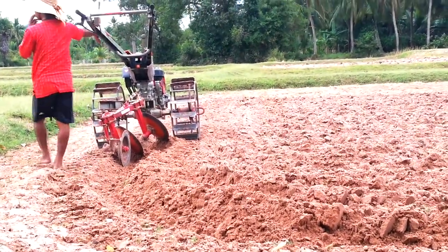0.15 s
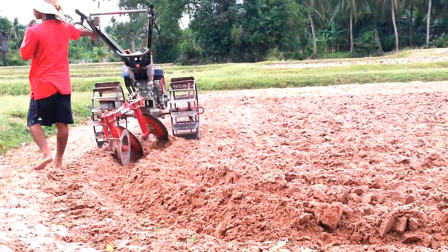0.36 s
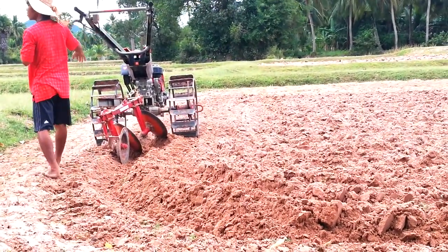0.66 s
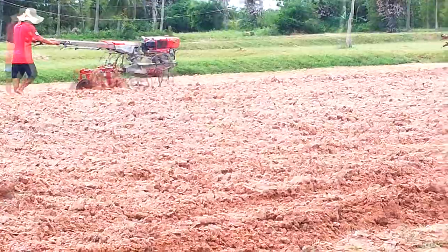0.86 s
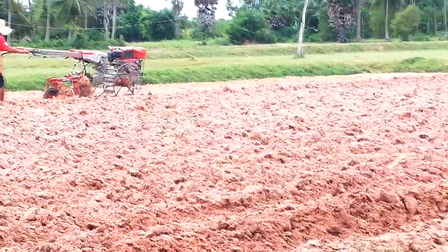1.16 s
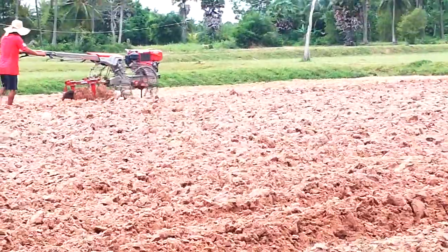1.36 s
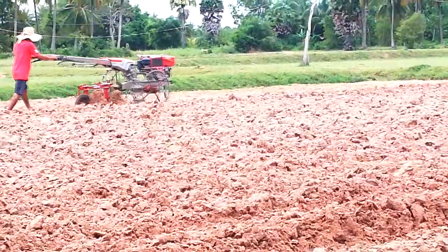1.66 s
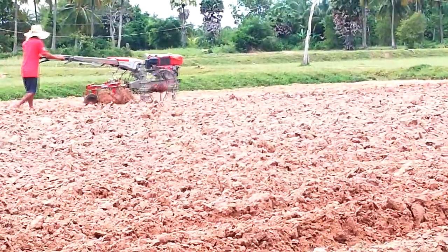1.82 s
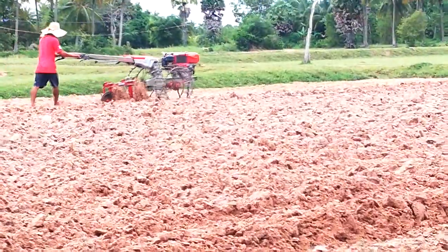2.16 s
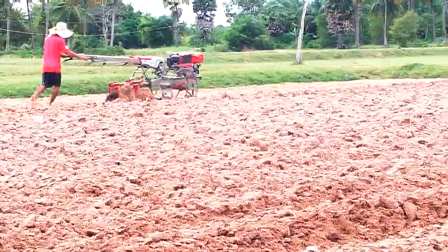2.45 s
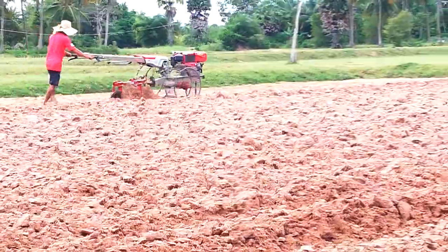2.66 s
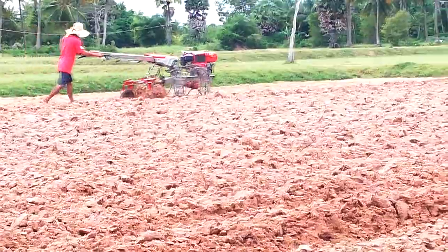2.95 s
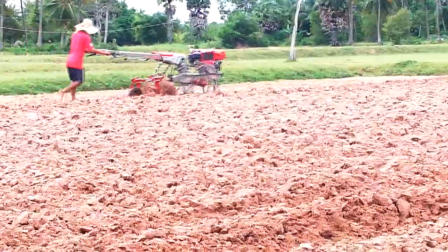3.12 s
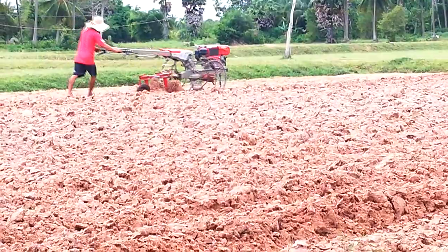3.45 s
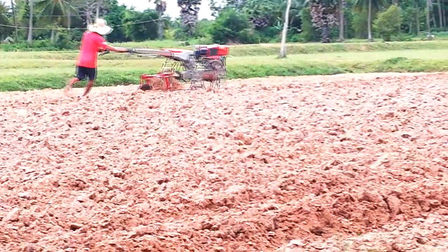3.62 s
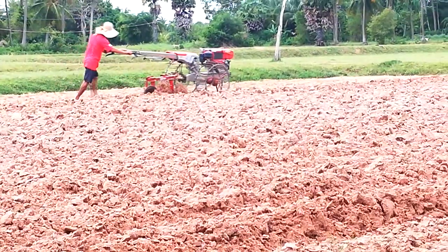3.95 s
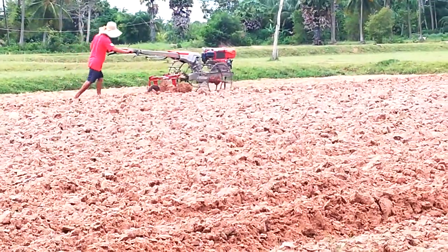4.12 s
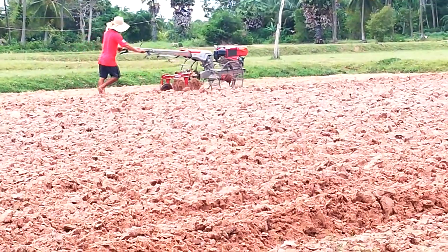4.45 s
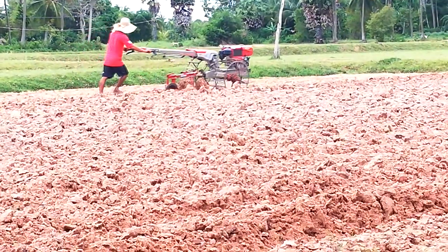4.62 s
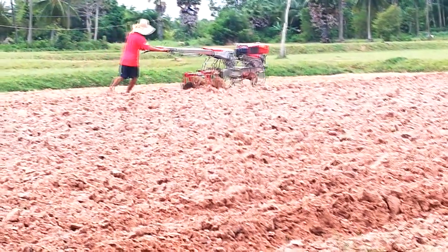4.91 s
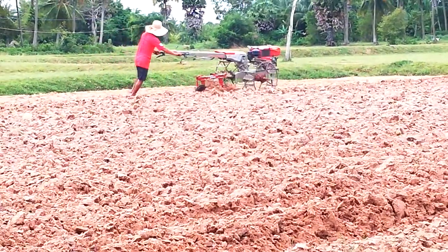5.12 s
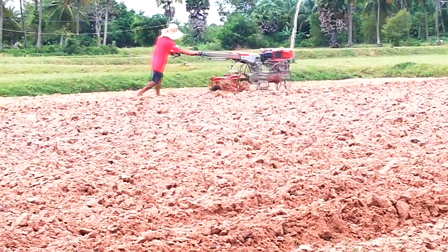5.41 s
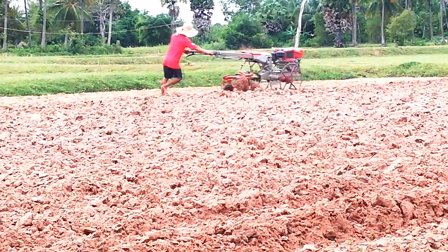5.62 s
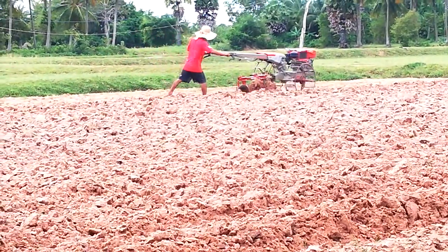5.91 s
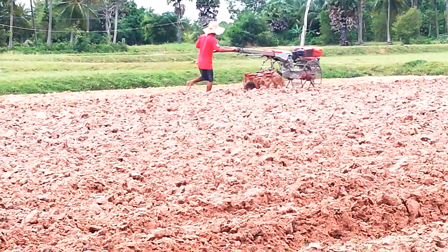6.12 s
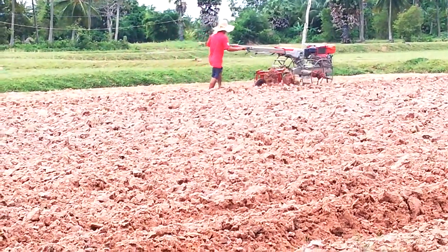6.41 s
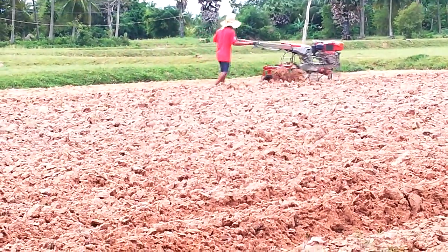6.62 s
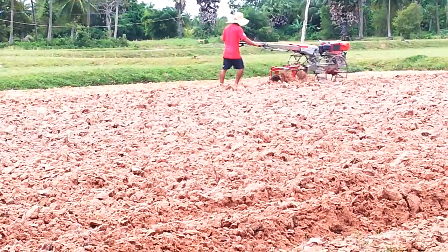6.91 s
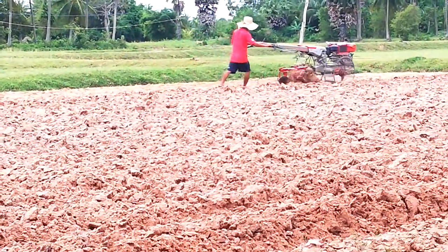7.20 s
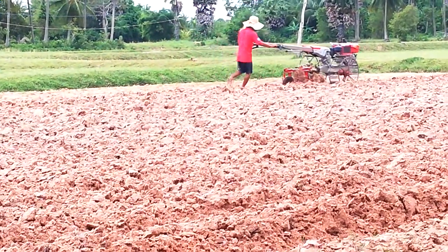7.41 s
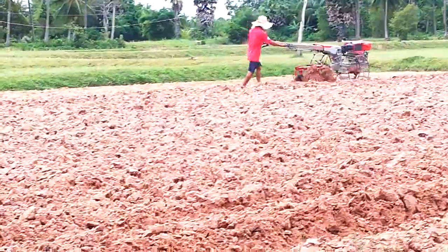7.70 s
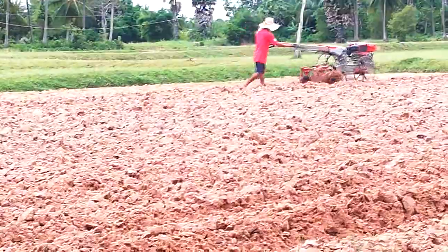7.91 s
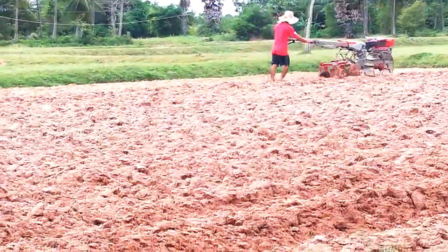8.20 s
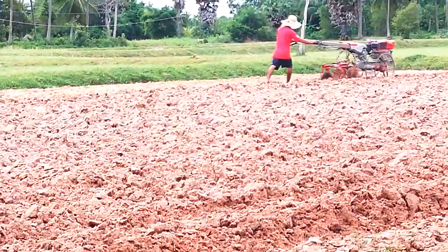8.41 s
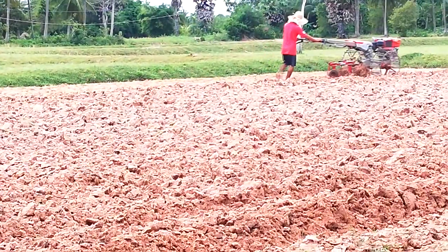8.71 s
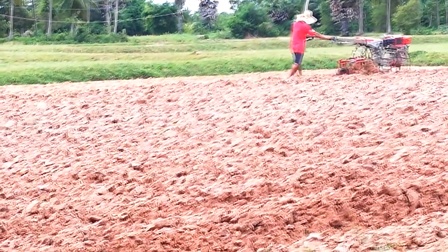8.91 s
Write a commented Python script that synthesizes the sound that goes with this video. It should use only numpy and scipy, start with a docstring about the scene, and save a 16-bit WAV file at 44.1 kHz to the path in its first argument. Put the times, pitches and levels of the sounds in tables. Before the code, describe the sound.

Steady slow diesel chugging, six or seven sharp knocks and thumps a second, with rattling metal and low soil rumble, gradually receding across an open field.

```python
"""A walking tractor ploughs dry soil in the open; its one-cylinder, four-stroke diesel fires 6 or 7 times a second.
Every cycle: intake gulp, a hum in the intake pipe as the valve shuts, firing knock, exhaust thump and hiss.
At first it is close, heard from behind, and loose ironwork clanks and leaves the covers rattling. The engine
slows, then picks up; the tractor shows its side and draws away, with a low swell, dull bursts and more clanks.
Near the end a plough disc sings briefly. Short pulses, ringing notes and filtered noise make the sounds."""
import sys
import numpy as np
from scipy import signal
from scipy.fft import rfft, irfft
from scipy.io import wavfile
from scipy.ndimage import uniform_filter1d, map_coordinates

SR = 44100
rng = np.random.default_rng(int(sys.argv[2]) if len(sys.argv) > 2 else 0)


def unload_wav(signal):
    """Save mono or channel-first audio to the path in sys.argv[1] as 16-bit WAV at rate SR, clipped to [-1, 1]."""
    wavfile.write(
        sys.argv[1],
        SR,
        np.round(np.clip(np.atleast_2d(signal).T, -1, 1) * 32767).astype(np.int16),
    )


N = 399546
TIME, HZ = np.arange(N) / SR, np.fft.rfftfreq(N, 1 / SR)

# engine speed: t/s, four-stroke cycles per second
ENGINE_SPEED = [(0.0, 7.052), (0.5, 7.273), (1.2, 7.084), (1.65, 7.184), (1.946, 6.544), (2.234, 6.191),
                (2.897, 5.948), (3.304, 6.522), (3.957, 6.583), (4.793, 6.45), (6.921, 6.83),
                (7.336, 7.116), (7.82, 7.224), (9.06, 7.049)]
START_TURN = -.1756  # place in the cycle at time 0, in cycles
# how hard the governor fuels the engine: t/s, load (0 to 1)
ENGINE_LOAD = [(0, 0.79), (1.52, 1), (1.68, 0.54), (2.1, 0.48), (2.45, 0.88), (3.1, 0.82), (3.95, 0.6),
               (4.65, 0.86), (6.8, 0.55), (8.1, 0)]
# how hard the fuel knocks: t/s, level/dB
KNOCK_HARDNESS = [(0, -4.5), (.35, -2.5), (.7, -0.5), (1.6, 3.5), (1.9, -2), (2.4, -5), (2.9, 0.5),
                  (3.3, 0.5), (3.9, 3), (5.55, 5), (6.1, 3), (7.15, 4), (7.5, -0.5), (7.85, 2), (8.3, -2),
                  (9.06, 1.5)]
# the tractor's way across the field: t/s, distance/m, aspect (0 behind, 1 beside, 2 ahead)
TRACTOR_PATH = [(0, 2.62, 0.056), (1.75, 5.5, 0.047), (3.75, 10.5, .02), (4.5, 13.9, 1.12),
                (5.5, 15.2, 1.04), (6.2, 17.5, 1.17), (7.1, 17.5, 0.86), (8.1, 23, 1.9), (9.06, 21, 1.92)]
NEAR_M = 5  # distance at which spreading changes no level

# steady rumble of gears, wheels and turning soil: f/Hz, relative level/dB
RUMBLE_COLOUR = [(35, -4), (80, -4.5), (150, 3.5), (260, 3.5), (380, -14.5), (580, -29.5), (1500, -24.5),
                 (16000, -49)]
# crumbling clods: f/Hz, relative level/dB
CLOD_COLOUR = [(200, -2.5), (540, 5.5), (680, -4), (880, 5.5), (1150, 0.5), (1500, -22), (3000, -11.5),
               (16000, -25)]
# brief low swells and crumbly bursts, the first one the longest: # t/s, low level/dB, crumbling level/dB,
# decay/s
LOW_SWELLS = [(3.4, -33, -47, 0.1), (4.11, -40, -42, 0.012), (7.458, -36, -46, 0.011)]
SWELL_RISE_S = 0.0082
# a plough disc rubs and sings: t/s, length/s, f/Hz, level/dB
DISC_SQUEALS = [(8.17, 0.18, 1180, -52)]
# a cover or a bar is jolted and zings around one note: t/s, f/Hz, level/dB, decay/s
METAL_ZINGS = [(0.121, 10640, -24.5, 0.0057), (.261, 11150, -27, 0.0055), (.369, 2100, -30, 0.019),
               (.404, 11000, -28, 0.0046), (.4855, 3770, -23.5, 0.014), (.486, 1348, -24, .016),
               (.495, 965, -25, .005), (.958, 10950, -27, 0.0045), (1.097, 11140, -31, .005),
               (1.348, 864, -33, 0.023), (1.377, 11000, -19, 0.01), (1.519, 11320, -21, 0.0097),
               (1.765, 2093, -32.5, 0.022), (1.766, 4000, -40.5, 0.048), (2.428, 10560, -30, 0.0094),
               (2.738, 5890, -43, 0.028), (4.022, 2650, -37, .011), (4.935, 10700, -40, 0.014),
               (6.853, 2660, -41, 0.0098), (6.953, 1120, -42, 0.0095), (6.954, 3590, -46, .014),
               (6.956, 4450, -40, 0.012)]
ZING_WIDTH, ZING_RISE_S = 0.0404, 0.00095  # width as a share of the note

# blows on plough and loose ironwork: t/s, relative clank level/dB, jingle level/dB, decay/s
IRON_KNOCKS = [(0.262, -31.5, -44, 0.0021), (0.483, -23.5, -21.5, 0.013), (0.5397, -37, -21, 0.0073),
               (.559, -34, -44, 0.0082), (1.3758, -40.5, -25.5, 0.0026), (1.517, -36.5, -23.5, 0.0049),
               (1.766, -53, -57, 0.018), (1.8, -44, -61, 0.0038), (2.738, -53, -33, 0.0091),
               (3.768, -40, -54, 0.011), (3.826, -52, -67, 0.013), (4.007, -57, -19, 0.0063),
               (4.02, -40, -33.5, 0.016), (4.072, -46, -42, 0.0026), (4.149, -46, -57, 0.018),
               (6.95, -46.5, -51, 0.02), (7.461, -52.5, -48, 0.01)]
# broad clank of the ironwork: f/Hz, relative level/dB
CLANK_COLOUR = [(200, -5), (600, -5.5), (1000, 1.5), (1360, -2.5), (1720, 0.5), (2740, -0.5), (3900, 1),
                (5430, -4.5), (9550, -9), (16000, -41)]
# bright jingle of the ironwork: f/Hz, relative level/dB
JINGLE_COLOUR = [(2350, -15), (4300, -12), (5600, -34), (6400, -0.5), (7400, -8.5), (8750, 3), (10400, 6),
                 (16000, -24)]
# ringing of the plough frame: f/Hz, relative level/dB, time to fall by 60 dB/s
PLOUGH_MODES = [(886, -15, 0.4), (960, -6, 0.26), (1242, -14, 0.18), (1333, -10, 0.15), (2290, -11, 0.19),
                (2710, -7, 0.19), (3710, -15, 0.35), (6200, -15, 0.14)]
LOOSE_DB, SETTLE_S = -19, 1  # rattle that a knock shakes loose, against its jingle; settling time

# metal blows of one cycle: place in the cycle (0 to 1), clatter level/dB, rattle level/dB, rise/s, decay/s
CYCLE_BLOWS = [(0.25, -4, -1.5, 0.001, 0.007), (0.458, 2, 5.5, 0.00017, 0.0065),
               (0.491, 4, -2, 0.00031, 0.021), (.585, -2, -4, 0.00072, 0.015),
               (0.706, -4, -12.5, 0.00092, 0.064), (.955, -1.5, -5.5, 0.0015, 0.011)]
# colour of the machine from behind: f/Hz, relative level/dB
COLOUR_BEHIND = [(200, 10.5), (400, 4.5), (580, -11), (900, 2.5), (1270, -10.5), (1800, -1.5), (2100, 0.5),
                 (3100, -6.5), (4200, -9), (5400, -15), (8000, -9.5), (10100, -5.5), (16000, -29)]
# colour of the machine from the side: f/Hz, relative level/dB
COLOUR_BESIDE = [(200, -13), (680, -36), (950, -7.5), (1480, -4.5), (1800, -15), (2150, -1), (3100, -5),
                 (4000, -14), (6000, -16.5), (8200, -10.5), (10000, -9), (16000, -31)]
# colour of the machine from far ahead: f/Hz, relative level/dB
COLOUR_AHEAD = [(200, -3), (520, -2), (720, -7), (930, 4), (1400, 10), (1850, 1), (2450, -1.5),
                (3400, -2.5), (4000, -17), (6000, -21.5), (8200, -15.5), (9900, -15), (11500, -22.5),
                (16000, -35)]
# ringing of block, flywheel and covers: f/Hz, width/Hz, relative level/dB from behind, beside, ahead
IRON_MODES = [(855, 10, 6, -20, 11), (947, 40, -4, 9.5, 4.5), (1196, 7.8, -24, -9.5, 4),
              (1410, 120, 6.5, -20, -8), (2043, 12, -17, 10, 9.5), (4020, 8.5, 13, -2, -30),
              (4380, 91, -6, 11, -18), (4724, 23, 6.5, 13, 14), (5803, 60, 10, 9.5, -6),
              (9850, 340, 1.5, 7.5, 6.5)]

# exhaust gas at the outlet: f/Hz, relative level/dB
HISS_COLOUR = [(300, -11), (650, -43), (900, -2.5), (1400, 0), (2000, 2), (3200, -12), (4300, 2),
               (5200, -8.5), (8200, -4), (10000, 14.5), (11000, 7.5), (12200, -11), (16000, -20)]
# the silencer shell rings with every blow-down: f/Hz, width/Hz, relative level/dB
SHELL_MODES = [(2340, 500, -4), (3500, 160, 17), (4400, 460, 10), (6600, 320, 17)]
# the blow-down lengthens with load, and its first, sucking swing grows against the second
BLOWDOWN_IDLE_S, BLOWDOWN_LOAD_S, SUCK_IDLE, SUCK_LOAD, FILL_POWER = 0.0047, 0.0065, 0.14, 0.47, 0.86

# the cylinder's answer to each ignition: f/Hz, decay/s, relative level/dB from behind, beside, ahead
CYLINDER_NOTES = [(544, 0.0058, -20, -11.5, -18), (860, 0.013, -8.5, -20, -26), (1167, 0.0067, -32, -24, 4),
                  (1452, 0.011, -13.5, 2.5, 3), (2032, 0.0098, 0, -2, -7), (2262, 0.0069, -13, 4, -16),
                  (2570, 0.0025, -4, 0, -36)]
EDGE_HZ = 16200  # upper band limit


def gain_of(db):
    """Decibels to amplitude."""
    return 10 ** (np.asarray(db) / 20)


def evened(x):
    """Scales to an average power of 1."""
    return x / np.sqrt(np.mean(x ** 2) + 1e-20)


def curve(rows, s, axis=1):
    """One column of a time table at the times s."""
    table = np.transpose(rows)
    return np.interp(s, table[0], table[axis])


def colour(points):
    """Gain at every frequency, drawn through a few points of a spectrum."""
    f, db = np.transpose(points)
    return gain_of(np.interp(np.log(HZ + 1), np.log(f + 1), db))


def shaped(x, gain):
    """Filters x and scales it to an average power of 1."""
    return evened(irfft(rfft(x) * gain, N))


def add(mix, s, sound):
    """Mixes a sound in at the time s, cutting what falls outside."""
    start = round(s * SR)
    sound, part = sound[max(-start, 0):], mix[max(start, 0):]
    part[:len(sound)] += sound[:len(part)]


def facing(s):
    """Side of the tractor that is heard at the times s: 0 behind, 1 beside, 2 ahead."""
    return np.clip(curve(TRACTOR_PATH, s, axis=2), 0, 2)


def level(db, load_db=0, ahead_db=0, falloff=0):
    """Level of a source over time: follows load, aspect and distance (falloff 1 = inverse distance)."""
    spreading = 20 * np.log10(curve(TRACTOR_PATH, TIME) / NEAR_M)
    return db + load_db * curve(ENGINE_LOAD, TIME) + ahead_db * facing(TIME) - falloff * spreading


def at(track, s):
    """Value of a running level at the time s."""
    return track[np.clip(round(s * SR), 0, N - 1)]


def moments(place):
    """Times at which the engine passes one place of its cycle."""
    t = np.arange(-SR // 5, N, 20) / SR
    turns = np.cumsum(curve(ENGINE_SPEED, t)) * (t[1] - t[0])
    turns += START_TURN - np.interp(0, t, turns)
    passes = np.arange(np.ceil(turns[0] - place), turns[-1] - place) + place
    return np.interp(passes, turns, t)


def strike(t, rise, decay):
    """Envelope with a soft start and an exponential fall, top 1."""
    shape = (1 - np.exp(-(t / rise) ** 2)) * np.exp(-t / decay)
    return shape / shape.max()


def ring(t, hz, db, rise, decay):
    """A gas resonance that builds up and dies."""
    return gain_of(db) * strike(t, rise, decay) * np.sin(2 * np.pi * hz * t)


def swing(t, width):
    """One pressure swing as it radiates from a small outlet: a peak between two shallow troughs."""
    return (1 - 2 * (t / width) ** 2) * np.exp(-(t / width) ** 2)


def grit(grain_db):
    """Noise whose strength jumps from millisecond to millisecond, like chattering metal."""
    grain = evened(uniform_filter1d(rng.standard_normal(N), 50))
    return evened(rng.standard_normal(N) * gain_of(grain_db * grain))


def taps(per_s):
    """Separate contacts of metal on metal, at random moments."""
    return evened(np.sign(rng.standard_normal(N)) * (rng.random(N) < per_s / SR))


def resonances(modes):
    """Frequency response of a set of modes (f/Hz, width/Hz, level/dB)."""
    return sum(gain_of(db) / (1 + 2j * (HZ - hz) / width) for hz, width, db in modes)


def crowded(db, decay):
    """Response of a metal body with countless short modes: the blow itself and a brief random ring."""
    t = np.arange(SR // 8) / SR
    tail = rng.standard_normal(len(t)) * np.exp(-t / decay)
    return 1 + gain_of(db) * rfft(tail / np.linalg.norm(tail), N)


def buzz(hz, decay):
    """A struck piece of metal: a cluster of close modes around one note, dying together."""
    t = np.arange(SR // 8) / SR
    notes = hz * (1 + ZING_WIDTH * rng.uniform(-1.1, 1, (8, 1)))
    shape = strike(t, ZING_RISE_S, decay)
    cluster = np.sin(2 * np.pi * (notes * t + rng.random(notes.shape)))
    return evened((shape * cluster).sum(0)) * np.sqrt(np.mean(shape ** 2))


def rumble(force, churn_level, drag_level, throb):
    """Wheels churn the soil and the discs crumble the clods, both shuddering with the engine."""
    shudder = (1 + throb * evened(uniform_filter1d(force[0], 900))) / (1 + throb)
    wheels, discs, t = gain_of(churn_level), gain_of(drag_level), np.arange(SR) / SR
    for s, low_db, crumble_db, decay in LOW_SWELLS:
        shape = strike(t, SWELL_RISE_S, decay)
        add(wheels, s, gain_of(low_db) * shape)
        add(discs, s, gain_of(crumble_db) * shape)
    churn = wheels * shaped(rng.standard_normal(N), colour(RUMBLE_COLOUR))
    crumble = discs * shaped(grit(grain_db=2.5), colour(CLOD_COLOUR))
    return shudder * (churn + crumble)


def squeals(waver):
    """Rubbing steel sings on one unsteady note that swells and fades."""
    out = np.zeros(N)
    for s, length, hz, db in DISC_SQUEALS:
        t = np.arange(0, length, 1 / SR)
        drift = evened(uniform_filter1d(rng.standard_normal(SR), size=300))[:len(t)]
        turns = np.cumsum(hz * (1 + waver * drift)) / SR
        swell = np.sqrt(np.sin(np.pi * t / length))
        add(out, s, gain_of(db) * swell * np.sin(2 * np.pi * turns))
    return out


def zings():
    """Each jolt makes a cover or a bar buzz briefly around one note."""
    out = np.zeros(N)
    for s, hz, db, decay in METAL_ZINGS:
        add(out, s, gain_of(db) * buzz(hz, decay))
    return out


def ironwork(tail_db, tail_decay, rise, ring_db, crash_db, rebound_s, rebound_db, count):
    """Each knock is a broad clank whose rebounds ring the frame, and a bright jingle that shakes on."""
    force, ringing, t = np.zeros((2, N)), np.zeros(N), np.arange(SR // 3) / SR
    for s, clank_db, jingle_db, decay in IRON_KNOCKS:
        shape = strike(t, rise, decay) + gain_of(tail_db) * strike(t, rise, tail_decay)
        add(force[0], s, gain_of(clank_db + crash_db) * shape)
        add(force[1], s, gain_of(jingle_db) * shape)
        contact = s + rise / 2
        for k in range(count):
            modes = sum(gain_of(db - 60 * t / t60) * np.sin(2 * np.pi * (hz * t + rng.random()))
                        for hz, db, t60 in PLOUGH_MODES)
            add(ringing, contact, gain_of(clank_db + ring_db + k * rebound_db) * modes)
            contact += rebound_s * rng.uniform(0.298, 1.8)
    clank = rfft(force[0] * grit(grain_db=1.0)) * evened(colour(CLANK_COLOUR))
    jingle = rfft(force[1] * grit(grain_db=3.5)) * evened(colour(JINGLE_COLOUR))
    return ringing + irfft((clank + jingle) * crowded(db=-5, decay=0.011), N)


def loosened():
    """Extra rattle of the tinware, shaken loose by each knock and settling again."""
    power, t = np.zeros(N), np.arange(4 * SR) / SR
    for s, _, jingle_db, _ in IRON_KNOCKS:
        add(power, s, (gain_of(jingle_db + LOOSE_DB) * np.exp(-t / SETTLE_S)) ** 2)
    return np.sqrt(power)


def pings(ping_level, place, low_hz, high_hz, decay):
    """A part struck at one place of every cycle answers each time with another note of its range."""
    out = np.zeros(N)
    for s in moments(place):
        size = gain_of(at(ping_level, s) + 2 * rng.standard_normal())
        add(out, s, size * buzz(rng.uniform(low_hz, high_hz), decay))
    return out


def blows(whirr_db, fizz_db, scatter_db, jitter, ticks_per_s, tick_db, tick_decay):
    """Shaking of block and tin covers as valve gear, injector and combustion strike; loose parts tick."""
    power, t = np.zeros((2, N)), np.arange(SR // 6) / SR
    for place, block_db, tin_db, rise, decay in CYCLE_BLOWS:
        times = moments(place)
        shape = strike(t, rise, decay)
        for s, (late, a, b) in zip(times, np.clip(rng.standard_normal((len(times), 3)), -1, 1)):
            on_block = gain_of(block_db + scatter_db * a)
            on_tin = gain_of(tin_db + scatter_db * (a + b) / np.sqrt(2))
            add(power[0], s + jitter * late, (on_block * shape) ** 2)
            add(power[1], s + jitter * late, (on_tin * shape) ** 2)
    ticks = (rng.random(N) < ticks_per_s / SR) * rng.exponential(1, N) * gain_of(tick_db) ** 2
    power[1] += signal.lfilter([1], [1, -np.exp(-2 / (tick_decay * SR))], ticks)
    # gears and belt keep the metal astir between blows
    return np.sqrt(power + gain_of([[whirr_db], [fizz_db]]) ** 2)


def machinery(force, clatter_level, rattle_level, ring_db, split_hz, taps_per_s, body_db, body_decay):
    """The block clatters low and the covers rattle high; each side has its own colour and modes."""
    block = force[0] * gain_of(clatter_level)
    tin = force[1] * np.hypot(gain_of(rattle_level), loosened())
    # hard blows set the big modes ringing most
    hard = np.minimum(force / force.std(1, keepdims=True) / 3, 1)
    drives = [(rfft(block * a * taps(taps_per_s)), rfft(tin * b * taps(2 * taps_per_s)))
              for a, b in [(1, 1), hard]]
    out, aspect, low = np.zeros(N), facing(TIME), 1 / (1 + (HZ / split_hz) ** 8)
    for k, side in enumerate([COLOUR_BEHIND, COLOUR_BESIDE, COLOUR_AHEAD]):
        dense = crowded(body_db, body_decay) / np.hypot(1, gain_of(body_db))
        modes = gain_of(ring_db) * resonances([(hz, width, dbs[k]) for hz, width, *dbs in IRON_MODES])
        lower = evened(colour(side) * np.sqrt(low))
        upper = evened(colour(side) * np.sqrt(1 - low))
        heard = sum((a * lower + b * upper) * body for (a, b), body in zip(drives, [dense, modes]))
        # blend from one side to the next as the tractor turns
        out += np.maximum(1 - abs(aspect - k), 0) * irfft(heard, N)
    return out


def flexing(x, bend, span):
    """Thin metal flexes as it shakes: its notes bend by a small share, anew in each span of seconds."""
    size = round(np.clip(span, .01, .2) * SR)
    drift = uniform_filter1d(uniform_filter1d(rng.standard_normal(N), size), size)
    drift *= bend / np.std(np.diff(drift))
    return map_coordinates(x, [np.arange(N) + drift], order=3, mode="nearest")


def intake(gulp_level, pop_level, cleaner_level, hum_level, gulp_hz, gulp_width, pop_s, pop_width,
           hum_hz, hum_detune, speed_power, scatter_db):
    """The valve opens with a pop and a gulp that booms in the air cleaner; as it shuts, the pipe hums on."""
    out, t, lead = np.zeros(N), np.arange(SR // 5) / SR, 1 / 80
    usual = np.mean(curve(ENGINE_SPEED, TIME))
    gulp_shape = np.exp(-((t - lead - .0005) / gulp_width) ** 2)
    gulp = gulp_shape * np.cos(2 * np.pi * gulp_hz * (t - lead))
    pop = swing(t - lead + pop_s, pop_width)
    cleaner = ring(t, hz=109.2, db=-30.5, rise=0.0065, decay=0.007)

    def strength(track, s):
        """Size of one pulse: it grows with engine speed and varies a little by chance."""
        faster = (curve(ENGINE_SPEED, s) / usual) ** speed_power
        return faster * gain_of(at(track, s) + scatter_db * rng.standard_normal())

    for s in moments(0):
        add(out, s - lead, strength(gulp_level, s) * gulp + strength(pop_level, s) * pop)
        add(out, s + .003, strength(cleaner_level, s) * cleaner)
    for s in moments(.262):  # the valve shuts
        pitch = 1 + hum_detune * rng.standard_normal()
        hum = ring(t, hz=hum_hz * pitch, db=-27.5, rise=0.0035, decay=0.031)
        hum = hum + ring(t * pitch, hz=308.3, db=-50.5, rise=0.0003, decay=0.086)
        add(out, s - .003, -strength(hum_level, s) * hum)
    return out


def exhaust(thump_level, hiss_level, shell_level, width, spread, crack, crack_s, crack_width,
            hiss_rise, hiss_decay, scatter_db):
    """Each blow-down: a crack as the valve lifts, a swing at start and end, silencer boom, spit of gas."""
    thumps, jet, t, lead = np.zeros(N), np.zeros(N), np.arange(SR // 8) / SR, 1 / 40
    boom = ring(t, hz=210.5, db=-33.0, rise=0.0032, decay=0.0059)
    for s in moments(.713):
        fill = max(curve(ENGINE_LOAD, s), 0) ** FILL_POWER
        length = BLOWDOWN_IDLE_S + BLOWDOWN_LOAD_S * fill
        suck = SUCK_IDLE + SUCK_LOAD * fill
        push, spit = gain_of(scatter_db * rng.standard_normal(2) * [1 / 2, 1])
        wide = width + spread * length  # a long blow-down is also deeper
        thump = swing(t - lead - length, wide) - suck * swing(t - lead, wide)
        thump = thump + crack * fill * swing(t - lead + crack_s, crack_width)
        add(thumps, s - lead, push * gain_of(at(thump_level, s)) * thump)
        add(thumps, s - .0033, push * boom)
        add(jet, s - .003, spit * strike(t, hiss_rise, hiss_decay))
    hiss = rfft(jet * gain_of(hiss_level) * grit(grain_db=3.0))
    shell = rfft(jet * gain_of(shell_level) * grit(grain_db=4.0)) * resonances(SHELL_MODES)
    return thumps + irfft((hiss + shell) * evened(colour(HISS_COLOUR)), N)


def chuff(chuff_level, high_hz, low_hz, slide_s, rise, decay, size):
    """After each firing a hollow, breathy note slides down: a tone roughened by slow noise."""
    out, t = np.zeros(N), np.arange(SR // 8) / SR
    turns = np.cumsum(low_hz + (high_hz - low_hz) * np.exp(-t / slide_s)) / SR
    for s in moments(.48):
        a, b = uniform_filter1d(uniform_filter1d(rng.standard_normal((2, len(t))), size), size)
        note = evened(a * np.cos(2 * np.pi * turns) + b * np.sin(2 * np.pi * turns))
        add(out, s, gain_of(at(chuff_level, s)) * strike(t, rise, decay) * note)
    return out


def ignition(knock_level, place, rise, detune, sag, scatter_db, slap_s, slap_db, count):
    """The fuel's hard blow rings the cylinder in sagging notes; ever weaker, uneven piston slaps follow."""
    out, t = np.zeros(N), np.arange(SR // 10) / SR
    for s in moments(place):
        aspect, blow = facing(s), s
        for k in range(count):
            clack = 0
            chances = rng.standard_normal((len(CYLINDER_NOTES), 3))
            for (hz, decay, *dbs), (a, b, c) in zip(CYLINDER_NOTES, chances):
                size = gain_of(np.interp(aspect, range(3), dbs) + scatter_db * a)
                # the note starts high and sags to its rest pitch
                turns = hz * (1 + detune * b) * (t + sag * decay * (1 - np.exp(-t / decay)))
                clack = clack + size * strike(t, rise, decay) * np.sin(2 * np.pi * (turns + c))
            add(out, blow, gain_of(at(knock_level, s) + np.sqrt(k) * slap_db) * clack)
            blow += slap_s * rng.uniform(.5, 1.6)
    return out


def scene():
    """The whole tractor in the open: bass carries farther than treble. Times are in s, widths too."""
    force = blows(whirr_db=-8.5, fizz_db=-11, scatter_db=2.0, jitter=0.00015,
                  ticks_per_s=24, tick_db=1, tick_decay=0.0023)

    churn = level(db=-42.5, ahead_db=0.5, falloff=0.09)
    drag = level(db=-55.0, load_db=7.5, ahead_db=-9.0, falloff=0.17)  # the discs face back
    ground = rumble(force, churn, drag, throb=22.0)
    knocks = ironwork(tail_db=-24.5, tail_decay=0.31, rise=0.00303, ring_db=1.0, crash_db=3.5,
                      rebound_s=0.0098, rebound_db=-2, count=3)
    loose = squeals(waver=0.009) + zings() + knocks

    hardness = curve(KNOCK_HARDNESS, TIME)
    clatter = level(db=-34.5, load_db=-5.0, ahead_db=1.84, falloff=1.357) + hardness / 2
    rattle = level(db=-37.0, load_db=-2.0, ahead_db=1.1, falloff=0.83)
    covers = pings(rattle - 2, place=.46, low_hz=8740, high_hz=10670, decay=0.0062)
    covers += pings(rattle - 6, place=0.57, low_hz=9100, high_hz=11000, decay=0.0073)
    block = pings(clatter - 2 - 6 * facing(TIME), place=.465, low_hz=747, high_hz=1271, decay=0.014)
    valve = pings(level(db=-49, ahead_db=-1), place=0.28, low_hz=2370, high_hz=2520, decay=0.0027)
    pipe = pings(level(db=-59.5, ahead_db=5.5), place=.91, low_hz=1125, high_hz=1453, decay=0.021)
    metal = machinery(force, clatter, rattle, ring_db=0.0, split_hz=4680, taps_per_s=2500,
                      body_db=0, body_decay=0.0028)
    metal = flexing(metal, bend=0.01155, span=0.0393)

    gulp = level(db=-17.0, load_db=-3.5, ahead_db=2.12, falloff=0.36)
    pop = level(db=-33.0, load_db=-2.5, ahead_db=-9, falloff=0.51)
    cleaner = level(db=4.0, load_db=-5.0, ahead_db=1.8, falloff=0.36)
    hum = level(db=-.5, load_db=2.0)
    air = intake(gulp, pop, cleaner, hum, gulp_hz=208.0, gulp_width=0.0034, pop_s=0.00402,
                 pop_width=0.00076, hum_hz=168.5, hum_detune=0.0068, speed_power=0.66, scatter_db=0.5)

    thump = level(db=-25.0, load_db=3.0, ahead_db=1.0, falloff=0.4)
    hiss = level(db=-59.5, load_db=35.5, falloff=0.95)
    shell = level(db=-44.5, load_db=12.5, ahead_db=1.5, falloff=1.0)
    gas = exhaust(thump, hiss, shell, width=0.0017, spread=0.23, crack=0.51, crack_s=0.003,
                  crack_width=0.0023, hiss_rise=0.001, hiss_decay=0.01, scatter_db=1.5)

    breath = level(db=-49.0, load_db=-5.5, ahead_db=-3.5, falloff=0.21)
    hollow = chuff(breath, high_hz=1595, low_hz=1038, slide_s=0.056, rise=0.0009, decay=0.034, size=380)
    knock = level(db=-33.5, load_db=-4.0, falloff=0.99) + hardness
    firing = ignition(knock, place=.466, rise=0.00085, detune=0.015, sag=0.028, scatter_db=3.0,
                      slap_s=.008, slap_db=-6.5, count=4)
    small_parts = covers + block + valve + pipe
    return (ground + loose + small_parts + metal + air + gas + hollow + firing)[None]


def record(dry):
    """Takes away everything above the band limit with a steep low-pass filter."""
    lowpass = signal.firwin(511, EDGE_HZ, window=("kaiser", 9), fs=SR)
    return signal.oaconvolve(dry, lowpass[None], "same")


dry = scene()
out = record(dry)
unload_wav(out)
```